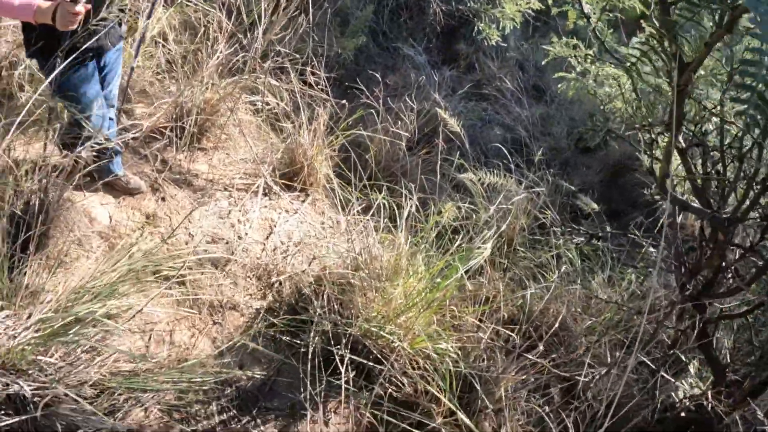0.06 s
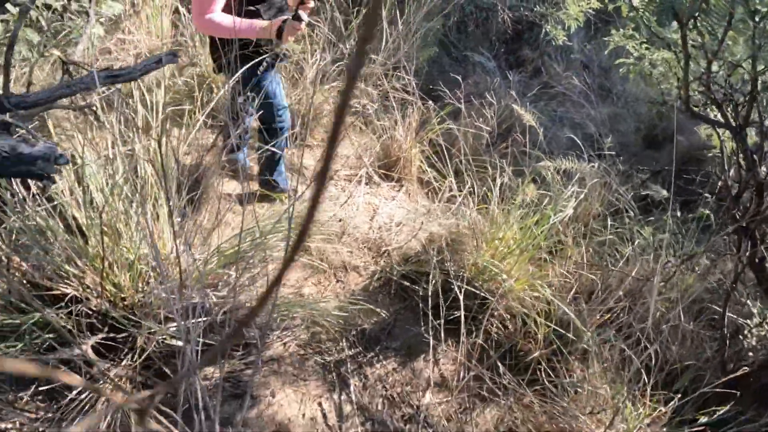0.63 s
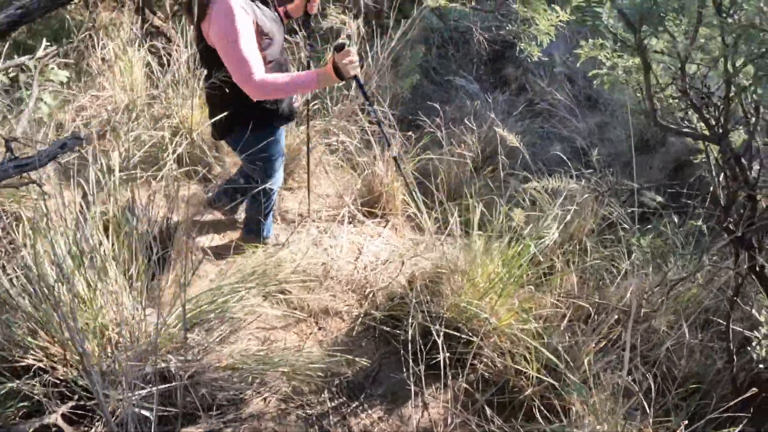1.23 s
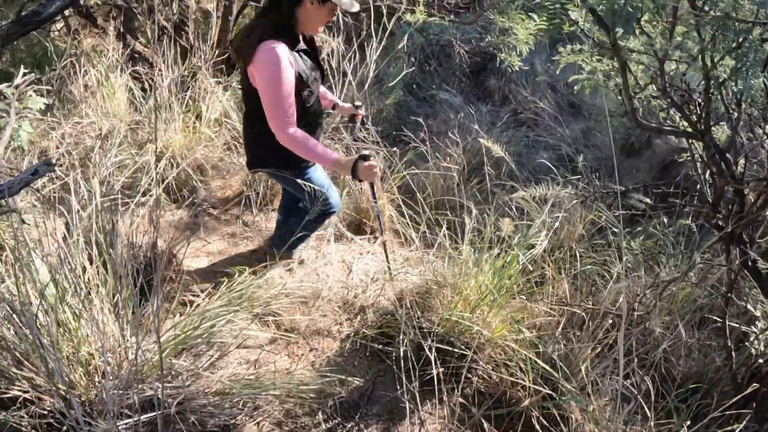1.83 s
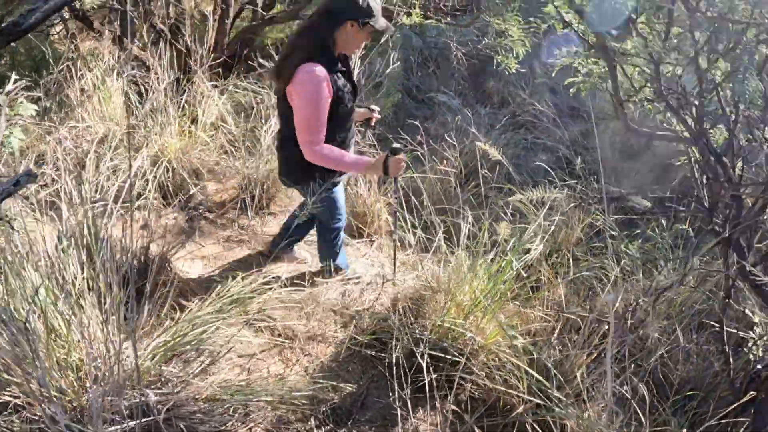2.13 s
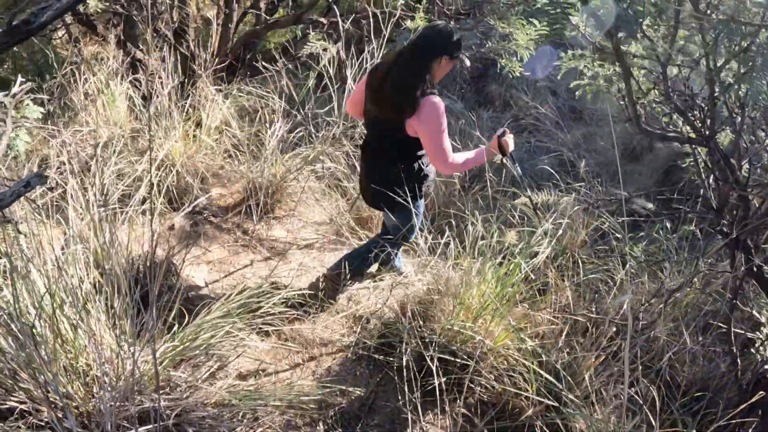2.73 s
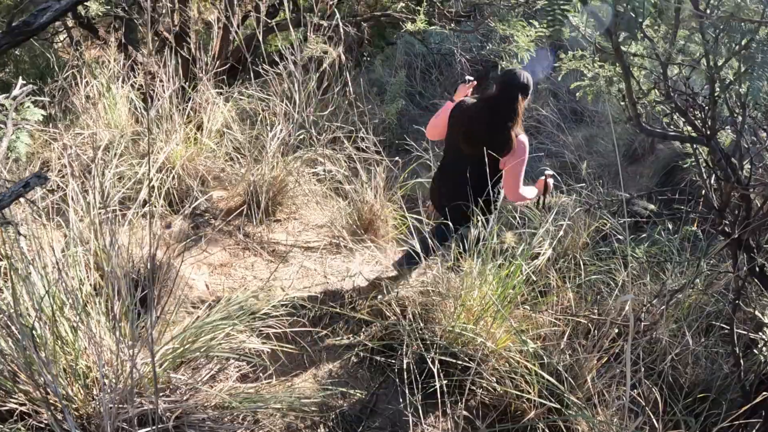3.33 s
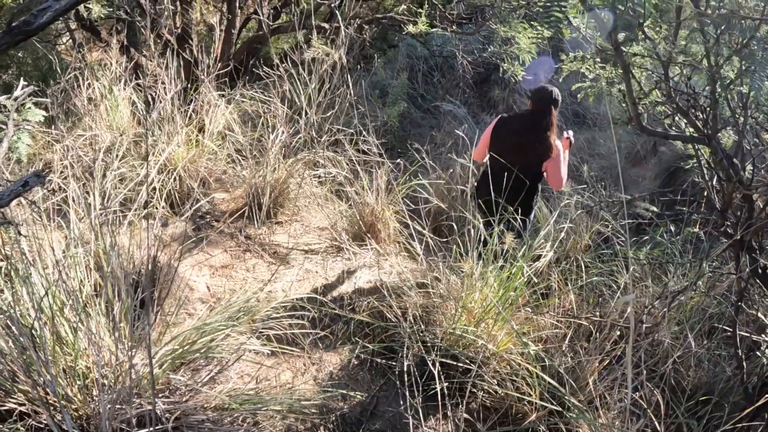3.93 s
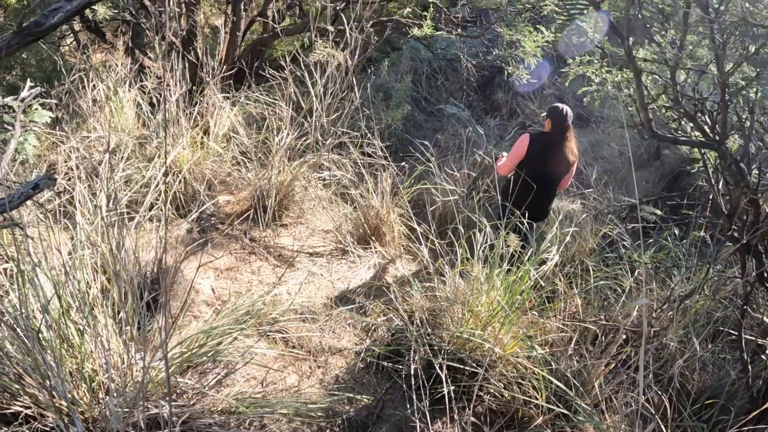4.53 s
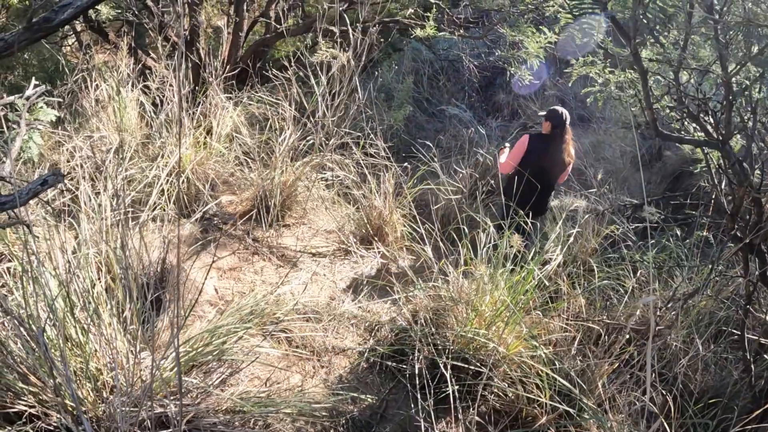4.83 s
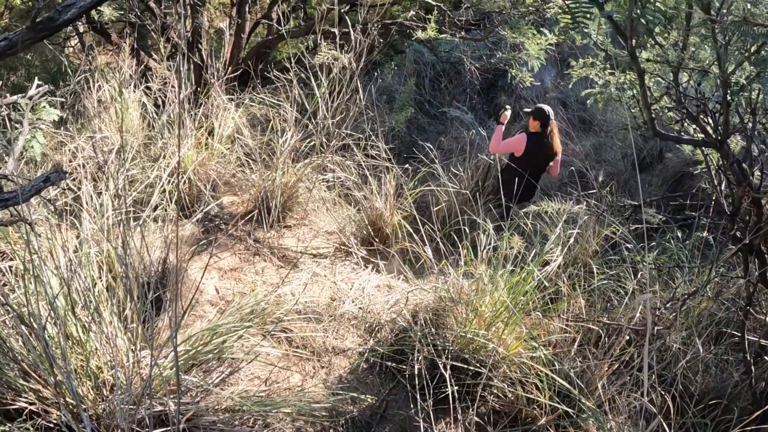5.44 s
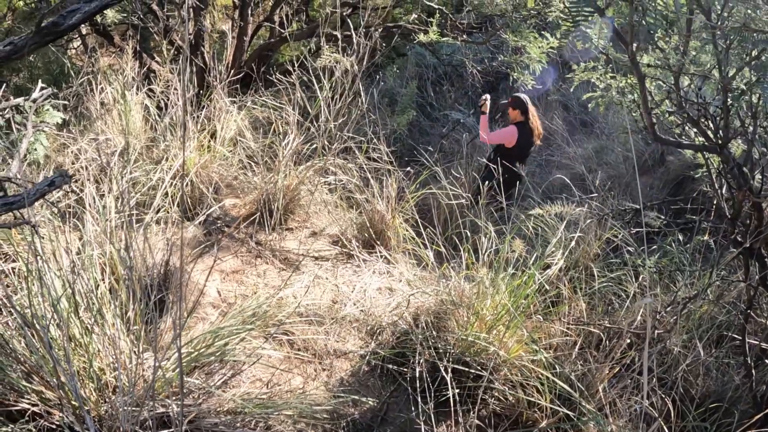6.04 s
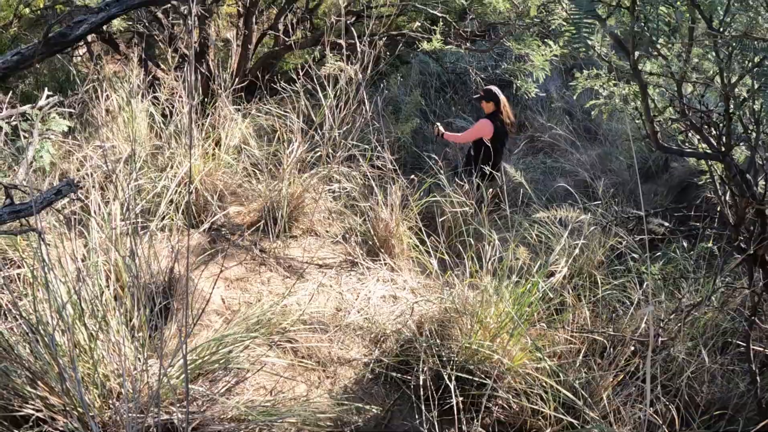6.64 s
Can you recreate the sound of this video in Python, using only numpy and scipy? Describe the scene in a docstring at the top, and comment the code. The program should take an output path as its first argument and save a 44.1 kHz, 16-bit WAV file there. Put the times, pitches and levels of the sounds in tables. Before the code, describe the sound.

A hiker with walking poles moves through dry grass on a sandy slope, heard fairly quietly on a hand-held microphone. In the first half second there are soft steps, faint rustling and small handling nudges, then a stronger low bump at 0.8 seconds. From about 1.3 seconds the grass swishes and crackles in uneven sweeps against the legs, while boots and pole tips land with soft thuds and a little sandy crunch. Thin stems snap throughout, with sharper cracks around 1.4, 2.1 and 2.2 seconds. From about 3 seconds the sound shifts slightly right and away, gradually losing its crispest edge. The loudest snap comes at 4 seconds, followed by others near 4.4, 5.1, 5.2, 5.8 and 6 seconds. Light wind rumbles low on the microphone, swelling a little around 5.2 seconds. The rustling eases toward the end at about 6.7 seconds.

```python
"""A sandy slope with dry grass. A hiker with walking poles pushes through, left to right and away.
Blades rub and crackle against her legs, single stems snap and splinter, boots and pole tips land
softly on the sand. Light air rumbles on the hand-held microphone, nudged a few times early on."""
import sys
import numpy as np
from scipy import signal
from scipy.fft import rfft, irfft, next_fast_len
from scipy.io import wavfile
from scipy.ndimage import uniform_filter1d

SR = 44100
rng = np.random.default_rng(int(sys.argv[2]) if len(sys.argv) > 2 else 0)


def wrap_up_sound(samples):
    """Save the sound to the file named by the first command line argument, as 16-bit audio."""
    columns = np.atleast_2d(samples).T
    # keep every value between -1 and 1, then stretch to whole-number steps
    tamed = np.clip(columns, -1, 1)
    steps = np.round(tamed * 32767).astype(np.int16)
    wavfile.write(sys.argv[1], SR, steps)


N = 294133
TIME = np.arange(N) / SR
FFT_SIZE = next_fast_len(N)
LOG_HZ = np.log(np.maximum(np.fft.rfftfreq(FFT_SIZE, 1 / SR), 1))

# hiker's path: time_s, rightward_share, tall_grass_share
PATH = [(0, 0.08, 0.06), (2.2, 0.1, 0.08), (3.1, 0.78, 0.3), (3.9, 0.93, 0.6), (4.6, 0.82, 0.77),
        (5.6, 1, 0.38), (6.67, 0.78, 0.81)]
# crisp top of blades and thin stems: time_s, relative_db
TREBLE = [(.2, 1.5), (.45, -4.5), (.85, -3), (1.15, -7), (2.0, -4.5), (2.6, 0), (3.45, -6.5), (3.7, -9),
          (4.6, -17.5), (5.5, -13.5), (6.67, -19)]
SIDE_NEAR_DB, SIDE_FAR_DB = -32.0, -13.0   # part scattered by the brush, opposed at the two ports
USUAL_PUSH_DB, USUAL_SNAP_DB, THIN_BEND_DB = -50, -30, -15.5


def from_db(db):
    """Decibels to gain."""
    return 10 ** (np.asarray(db) / 20)


def rms_one(x):
    """Scale to rms 1."""
    return x / np.sqrt(np.mean(x ** 2) + 1e-20)


def unit_energy(x):
    """Scale to a sum of squares of 1."""
    return x / np.sqrt(np.sum(x ** 2) + 1e-20)


def in_time(rows):
    """Each value column of a curve at every sample."""
    time_s, *columns = np.transpose(rows)
    return [np.interp(TIME, time_s, column) for column in columns]


def along_path(near, far):
    """Blend from near to far as the hiker moves right and away."""
    return near + (far - near) * in_time(PATH)[0]


def add(out, start_s, sound):
    """Mix a sound in at start_s."""
    i = max(0, round(start_s * SR))
    out[..., i:i + sound.shape[-1]] += sound[..., :max(0, N - i)]


def drift(corner_hz):
    """Slow random wander, rms 1."""
    hop, settle = 40, 2000
    pole = np.exp(-2 * np.pi * corner_hz * hop / SR)
    noise = rng.standard_normal(N // hop + settle + 2)
    slow = signal.lfilter([1], [1, -2 * pole, pole * pole], noise)[settle:]
    return np.interp(np.arange(N) / hop, np.arange(len(slow)), rms_one(slow))


def band(x, low_hz, high_hz, order=2):
    """Causal band-pass."""
    sos = signal.butter(order, [low_hz, high_hz], "band", fs=SR, output="sos")
    return signal.sosfilt(sos, x + 1e-18)


def resonate(x, hz, width_hz):
    """One resonance, peak gain 1."""
    r = np.exp(-np.pi * width_hz / SR)
    feedback = [1, -2 * r * np.cos(2 * np.pi * hz / SR), r * r]
    return signal.lfilter(np.array([1, 0, -1]) * (1 - r * r) / 2, feedback, x + 1e-18)


def response(hz, values, outside=None):
    """Interpolate onto the FFT bins over log frequency."""
    return np.interp(LOG_HZ, np.log(hz), values, left=outside, right=outside)


def filtered(x, gain):
    """Apply one gain per FFT bin."""
    return irfft(rfft(x, FFT_SIZE) * gain, FFT_SIZE)[..., :N]


def colour(x, spectrum):
    """Shape by rows of freq_hz, gain_db; rms 1."""
    hz, db = np.transpose(spectrum)
    return rms_one(filtered(x, from_db(response(hz, db, outside=-90))))


def widen(mid, side, side_db):
    """Left and right from a shared and an opposed part."""
    return (mid + from_db(side_db) * side * np.array([[1], [-1]])) / np.sqrt(1 + from_db(2 * side_db))


def strokes(rows, attack_s=.024, swell_share=.2, release_s=.034):
    """Gain of strokes that rise, hold and die away; long ones rise slower, overlaps add in power."""
    power = 1e-12
    for start_s, length_s, level_db in rows:
        rise = np.clip((TIME - start_s) / (attack_s + swell_share * length_s), 0, 1)
        fall = np.exp(-np.clip(TIME - start_s - length_s, 0, 1) / release_s)
        power = power + (from_db(level_db) * rise * fall) ** 2
    return np.sqrt(power)


def air_rumble(trim_db=-1.5, gust_db=2.5, lee_db=-6.5):
    """Air tumbles over the ports, the left one in the lee as the microphone turns."""
    # air flow: time_s, level_db
    flow = [(0, -50), (.4, -47.5), (.9, -46.5), (1.6, -51.5), (3.0, -47.5), (3.6, -44), (4.4, -44.5),
            (5.2, -37), (5.8, -44.5), (6.67, -41.5)]
    # turbulence spectrum: freq_hz, gain_db
    spectrum = [(12, 18.5), (30, 1.5), (50, -2.5), (68, -18), (100, -29.5), (200, -45)]
    turbulence = colour(widen(*rng.standard_normal((2, N)), side_db=-22.0), spectrum)
    gusts = from_db(in_time(flow)[0] + trim_db + gust_db * drift(9.0))
    lee = from_db(along_path(0, lee_db) * np.array([[.5], [-.5]]))
    return turbulence * gusts * lee


def handling(waver_db=2.5):
    """The hand shifts its grip and nudges the housing, which rocks briefly."""
    # shifting grip: time_s, level_db
    grip = [(0, -88), (.35, -60), (1.0, -59.5), (1.2, -49), (1.4, -58), (1.9, -60.5), (2.55, -62.5),
            (2.9, -74), (6.67, -74)]
    # nudges: start_s, level_db, pitch_hz, rise_s
    nudges = [(0.266, -29.5, 112, 0.003), (0.295, -32.5, 45.4, 0.0055), (0.332, -40, 104, 0.0094),
              (0.417, -39.5, 50, .01), (0.475, -36.5, 54, 0.007), (0.81, -16.5, 71.7, 0.0065)]
    grip_gain = from_db(in_time(grip)[0] + waver_db * drift(18.0))
    out = grip_gain * rms_one(band(rng.standard_normal(N), 24, 123, order=3))
    t = np.arange(SR // 6) / SR
    for start_s, level_db, pitch_hz, rise_s in nudges:
        swell = (t / rise_s) ** 2 * np.exp(2 * (1 - t / rise_s))
        add(out, start_s, -from_db(level_db) * swell * np.sin(2 * np.pi * pitch_hz * t))
    return out


def push():
    """Legs and poles sweep through stirring grass; returns blade and grit levels in dB."""
    # sweeps: start_s, length_s, level_db, grit_re_level_db
    sweeps = [(0.18, .06, -59, -7.5), (0.475, .04, -54, -1), (0.65, .06, -50, -4), (0.83, .11, -50, -1),
              (1.0, .13, -53, -4.5), (1.28, .1, -54, -20), (1.405, .07, -45, -3.5), (1.509, .07, -45, -2.5),
              (1.591, .07, -48, -5), (1.735, .07, -47, -7), (1.925, .05, -48, -7), (2.01, .16, -45.5, -6.5),
              (2.195, .07, -45, -5.5), (2.475, .085, -49, -5), (2.609, .06, -56, -1.5),
              (2.777, .07, -52, -11), (2.905, .17, -46, -8), (3.085, .045, -46, -6), (3.17, .17, -52, -12),
              (3.39, .08, -48, -8.5), (3.51, .06, -50, -12.5), (3.665, .1, -53, -3.5),
              (3.79, .27, -47, -11.5), (4.1, .11, -47, -22), (4.33, .15, -49, -9), (4.54, .16, -50, -8),
              (4.75, .09, -52, -19), (4.921, .1, -51, -10), (5.06, .24, -49, -11), (5.4, .18, -52, -16),
              (5.62, .43, -48, -17), (6.155, .05, -50, 0.5), (6.268, .17, -56, -20)]
    # stirring between sweeps: time_s, level_db
    stir = [(0, -68), (.3, -67), (.55, -57), (.8, -58), (1.0, -59), (1.7, -52), (2.15, -54), (2.37, -61),
            (2.7, -58), (3.35, -52), (3.65, -58), (4.1, -50), (4.9, -56), (5.5, -52), (6.45, -54),
            (6.67, -60)]
    stir_db = in_time(stir)[0]
    blade_strokes = strokes([row[:3] for row in sweeps])
    grit_strokes = strokes([(s, length_s, db + grit_db) for s, length_s, db, grit_db in sweeps])
    blades = np.hypot(blade_strokes, from_db(stir_db))
    grit = np.hypot(grit_strokes, from_db(stir_db + along_path(-2.5, -10)))
    return 20 * np.log10([blades, grit])


def crackle(per_s, spread_db=4.5, cycles=17.0, tick=0.8, blades=36):
    """Tiny random fractures tick and ring at their blade's pitch, stiff blades longer than limp ones."""
    breaks = np.flatnonzero(rng.random(N) < per_s / SR)
    sizes = from_db(spread_db * np.minimum(rng.exponential(1, len(breaks)), 3.2))
    sizes *= rng.choice([-1, 1], len(breaks))
    blade = rng.integers(0, blades, len(breaks))
    out = np.zeros(N)
    for k, hz in enumerate(np.geomspace(700, 15000, blades)):
        stiffness = 2 ** rng.uniform(-0.9, 1)
        clicks = np.zeros(N)
        clicks[breaks[blade == k]] = sizes[blade == k]
        out += np.sqrt(stiffness) * resonate(clicks, hz, hz / (cycles * stiffness))
    out[breaks] += sizes / blades ** .5 * tick
    return rms_one(out)


def tufts(x, bands=10, spread_db=1.57, drift_hz=19):
    """Colour shifts from tuft to tuft: overlapping bands swell and sink independently."""
    centres_hz = np.geomspace(900, 11000, bands)
    parts = [filtered(x, response(centres_hz, share)) for share in np.eye(bands)]
    return rms_one(sum(part * from_db(spread_db * drift(drift_hz)) for part in parts))


def grass(push_db, grit_re_push_db, clump_db=1.23, tall_top_db=4.0):
    """Blades rub and fracture in clumps; a harder push breaks more, distance adds scatter."""
    # spectra of short grass, tall grass, grit, crisp top and its scatter: freq_hz, gain_db
    short_grass = [(1200, -40), (1800, -25.5), (2250, -11), (2900, -1), (3800, 1.5), (5100, 2.5),
                   (6300, -1.5), (7400, -0.5), (8300, -3.5), (9500, -10), (12000, -29)]
    tall_grass = [(1200, -8.5), (1800, -9.5), (2500, -10), (3400, -0.5), (4200, 1), (5100, 1.5),
                  (6800, 1.5), (7600, -2), (8100, -12), (9800, -3.5), (12500, -11.5)]
    grit_spectrum = [(250, -0.5), (450, -3), (750, -3), (980, -4), (1250, 1), (1550, -0.5), (1900, 1),
                     (2400, 1.5), (3200, -9)]
    top_spectrum = [(6500, -44), (8200, -13.5), (9500, -6.5), (11000, -6), (12200, 4), (13000, 5),
                    (14200, -1), (16000, -20)]
    scatter_spectrum = [(7000, 5), (8500, -12), (11000, -8), (12200, 16), (13200, 8), (14200, -1),
                        (15500, -7)]
    tall = in_time(PATH)[1]
    clumps = drift(45)
    grains = crackle(per_s=3400 * from_db(.3 * (push_db - USUAL_PUSH_DB) + 2.5 * clumps))
    grains /= np.sqrt(uniform_filter1d(grains ** 2, size=SR // 12) + 1e-6)   # same rms at any density
    rub, scattered, sizzle = rng.standard_normal((3, N))
    side_db = along_path(SIDE_NEAR_DB, SIDE_FAR_DB)
    texture = widen(tufts(grains + from_db(0.5) * rub), scattered, side_db)
    blades = np.sqrt(1 - tall) * colour(texture, short_grass)
    blades += np.sqrt(tall) * colour(texture, tall_grass)
    grit = from_db(grit_re_push_db) * colour(texture, grit_spectrum)
    top = widen(colour(grains + rub, top_spectrum), colour(sizzle, scatter_spectrum), side_db=-9.0)
    top *= from_db(in_time(TREBLE)[0] + tall_top_db * tall)
    return from_db(push_db) * (blades + grit + top) * rms_one(from_db(clump_db * clumps))


def scuffs(push_db, follow_share=.45):
    """Soles scuff dully, partly following the push; a hand or sleeve rubs now and then."""
    # hand or sleeve rubs: start_s, length_s, level_db
    rubs = [(0.18, 0.046, -57), (1.07, 0.19, -53.5), (6.18, 0.24, -61.5)]
    # scuff spectrum: freq_hz, gain_db
    spectrum = [(90, -22), (140, -1), (200, 3.5), (280, -6), (400, -20.5), (800, -27)]
    soles = from_db(along_path(-63.0, -70.0) + follow_share * (push_db - USUAL_PUSH_DB))
    friction = colour(widen(*rng.standard_normal((2, N)), side_db=-22.0), spectrum)
    return np.hypot(soles, strokes(rubs)) * friction


def steps(thud_s=0.015, sand_s=0.016, thud_db=-2.0, bare_s=0.00047, cushion_s=0.002):
    """Boots and pole tips land with a soft thud and a crunch of sand; tall grass cushions the onset."""
    # landings: start_s, level_db, sand_re_level_db
    landings = [(0.264, -42, -13.5), (0.412, -44, -10), (0.893, -41.5, -17), (1.428, -45, -16),
                (1.751, -39.5, -10), (1.787, -52.5, 3), (1.947, -46.5, -12), (2.224, -45, -4),
                (3.119, -55, -4), (3.736, -41, -9), (3.886, -47.5, -3), (3.975, -39.5, -12),
                (4.383, -40.5, -3), (4.482, -46, 2.5), (4.657, -45, -5), (4.964, -44, -10), (5.49, -49, -9),
                (6.191, -56, 2)]
    out, t = np.zeros(N), np.arange(SR // 6) / SR
    tall = in_time(PATH)[1]
    for start_s, level_db, sand_db in landings:
        earth, sand = rng.standard_normal((2, len(t)))
        thud = from_db(thud_db) * rms_one(band(earth, 138, 243)) * np.exp(-t / thud_s)
        crunch = from_db(sand_db) * rms_one(band(sand, 280, 1400)) * np.exp(-t / sand_s)
        onset = 1 - np.exp(-t / (bare_s + cushion_s * tall[round(start_s * SR)]))
        add(out, start_s, from_db(level_db) * onset * (thud + crunch))
    return out


def thin_stems(push_db, mean_per_s=6.4, over_push_db=7.5, spread_db=3.5, centre_hz=5100):
    """Rows for snaps(): thin stems give way at random, more often and louder under a harder push."""
    effort = np.cumsum(from_db(push_db))
    top_db = in_time(TREBLE)[0]
    rows = []
    for when, size, pitch in rng.random((round(mean_per_s * N / SR), 3)):
        i = np.searchsorted(effort, when * effort[-1])
        level_db = push_db[i] + over_push_db + spread_db * (2 * size - 1)
        rows.append((i / SR, level_db, centre_hz * 2 ** (pitch - .5), THIN_BEND_DB, top_db[i]))
    return rows


def fracture(level_db, side_db, crack_s=0.00057, splinter_s=0.0035, glance_s=0.0017):
    """One crack, then splintering fibres; louder breaks are cleaner. Rows: bare crack, left, right."""
    t = np.arange(SR // 20) / SR
    fibres, splinters, scattered, uneven, glancing = rng.standard_normal((5, len(t)))
    tear = from_db(-0.5) * unit_energy(fibres * np.exp(-t / crack_s))
    crack = unit_energy((t == 0) + tear)
    wide_crack = widen(crack, unit_energy(glancing * np.exp(-t / glance_s)), side_db)
    dying = (1 - np.exp(-t / .0006)) * np.exp(-t / splinter_s) * from_db(3 * uneven)
    tail = widen(unit_energy(splinters * dying), unit_energy(scattered * dying), side_db)
    splinter_db = -6 - 0.23 * (level_db - USUAL_SNAP_DB)
    return np.vstack([crack, wide_crack + from_db(splinter_db) * tail])


def snaps(thin_rows, ring_db=12.0, ring_width_hz=650, bend_width_hz=330, level_window_s=0.002):
    """Each breaking stem rings briefly, with two lower bending modes, woody lows and a crisp top."""
    # thick stems: start_s, level_db, ring_hz, bend_re_level_db, top_re_level_db
    thick_rows = [(0.566, -39.5, 5590, -22, -5), (0.584, -38.5, 4120, -11, 0),
                  (0.6837, -34.5, 6400, -6, -3.5), (0.8943, -43, 2410, 0, -14), (1.298, -36, 6300, -4, -11),
                  (1.4315, -22.5, 5470, -12, -10), (1.4639, -30, 2170, -10.5, -5),
                  (1.532, -38, 7190, -12, -1), (1.621, -28.5, 3100, -12, -5.5),
                  (1.688, -40.5, 3280, -10, 8), (1.7544, -38, 6800, -1.5, 3.5), (1.776, -42, 6720, -10, 6),
                  (1.9495, -41.5, 3480, -19, 1), (1.9619, -30.5, 5200, -30, -6), (2.08, -32, 5170, -28, -1),
                  (2.1061, -26.5, 5200, -40, -3), (2.2275, -26.5, 4620, -11.5, -9),
                  (2.5351, -31.5, 2570, -13, -10), (2.841, -37.5, 4050, -25, -8),
                  (2.9511, -37, 3760, -18, -4), (3.1924, -38.5, 5030, -18, -4),
                  (3.3384, -34.5, 5850, -21, -4.5), (3.4244, -45, 8480, -15, 9.5),
                  (3.8667, -29, 5400, -29, -7), (3.9282, -28, 4620, -15, -12),
                  (3.9764, -16.5, 4920, -5.5, -13.5), (4.067, -30, 4930, -34, -19),
                  (4.3533, -33.5, 5140, -14, -13), (4.3786, -34, 5140, -16, -16),
                  (4.3892, -25, 6960, -3, -10), (4.4861, -39, 4680, 2, -27), (4.9454, -28, 6450, -35, -9),
                  (5.1311, -22.5, 5900, -7, -7.5), (5.2257, -22, 3930, -43, -20),
                  (5.2656, -34, 4500, -25, -3.5), (5.2759, -31.5, 6100, -17, -22),
                  (5.839, -26.5, 3650, -17, -13), (5.8476, -29, 5400, -29, -12),
                  (6.0286, -25.5, 6970, -8, -10)]
    out = np.zeros((2, N))
    woody_db = along_path(-14.5, -28)   # near: crushed on sand; far: standing in grass
    side_db = along_path(SIDE_NEAR_DB, SIDE_FAR_DB)
    for start_s, level_db, ring_hz, bend_db, top_db in thick_rows + thin_rows:
        i = int(start_s * SR)
        force = fracture(level_db, side_db[i])
        ring = from_db(ring_db) * resonate(force, ring_hz, ring_width_hz)
        stem = band(force + ring, 2440, 8360, order=4)
        low_mode, high_mode = (resonate(force, r * ring_hz, bend_width_hz) for r in (0.391, 0.592))
        bend = band(low_mode - high_mode, 1370, 4000, order=4)
        wood = band(force, 520, 1670, order=3)
        wood_db = woody_db[i] + 0.18 * (bend_db - THIN_BEND_DB)
        top = band(force, 9330, 13500, order=3)
        for part, part_db in [(stem, 0), (bend, bend_db), (wood, wood_db), (top, top_db)]:
            bare, stereo = part[0], part[1:]
            gain = from_db(level_db + part_db) * np.sqrt(SR * level_window_s) / np.linalg.norm(bare)
            add(out, start_s, gain * stereo)
    return out


def slope_echo(x, decay_s=0.24, echo_db=-25.5):
    """Brush and the bank scatter back a short, faint wash."""
    t = np.arange(SR // 4) / SR
    envelope = np.exp(-t / decay_s) * (1 - np.exp(-t / 0.003))
    mid, side = band(rng.standard_normal((2, len(t))), 840, 11000) * envelope
    paths = widen(unit_energy(mid), unit_energy(side), side_db=-23.0)
    return from_db(echo_db) * signal.fftconvolve(x, paths, axes=1)[:, :N]


def place(x, right_boost_db=1.98):
    """As the hiker moves right, the left port hears her later and shaded by the housing."""
    # left port, source far right: freq_hz, shade_db, lag_rad
    housing_shadow = [(100, -2, 0.53), (700, -3, 1), (1500, -2, 0.69), (3000, -3, 0.75), (5540, -1, 0.69),
                      (8000, -1, 0.072), (11900, -2, -0.27), (16000, -6, -0)]
    hz, shade_db, lag_rad = np.transpose(housing_shadow)
    shadow = from_db(response(hz, shade_db)) * np.exp(-1j * response(hz, lag_rad))
    rightward = in_time(PATH)[0]
    left = (1 - rightward) * x[0] + rightward * filtered(x[0], shadow)
    return np.array([left, x[1]]) * from_db(right_boost_db * rightward)


def scene():
    """Grass, stems and steps move with the hiker; air and handling stay at the microphone."""
    push_db, grit_db = push()
    stems = snaps(thin_stems(push_db))
    hiker = grass(push_db, grit_db - push_db) + stems + slope_echo(stems) + steps() + scuffs(push_db)
    return place(hiker) + air_rumble() + handling()


def record(dry, cutoff_hz=16000):
    """The left port is brighter near 12 kHz, the right one duller; the top is cut."""
    # microphone ports: freq_hz, left_db, right_db
    ports = [(19.9, -2, -1), (9200, -3, -3.5), (11400, -2.5, -5), (12300, 2.5, -4), (13160, 1, -7.5),
             (14900, -4, 1.5)]
    hz, *ports_db = np.transpose(ports)
    heard = filtered(dry, from_db([response(hz, db) for db in ports_db]))
    return signal.sosfilt(signal.ellip(10, .1, 80, cutoff_hz, fs=SR, output="sos"), heard)


dry = scene()
out = record(dry)
wrap_up_sound(out)
```